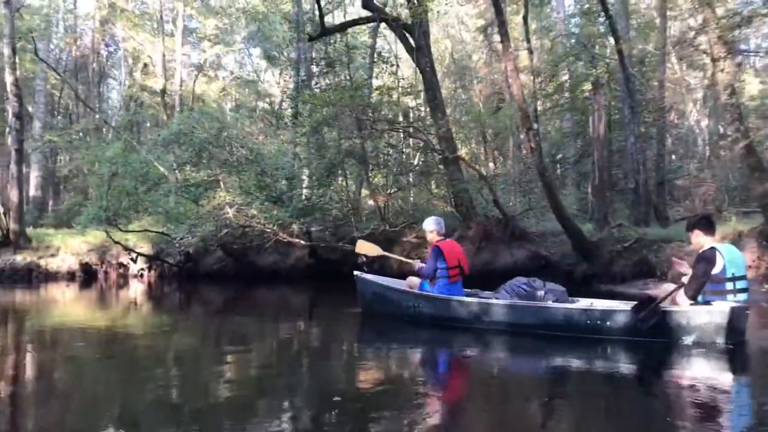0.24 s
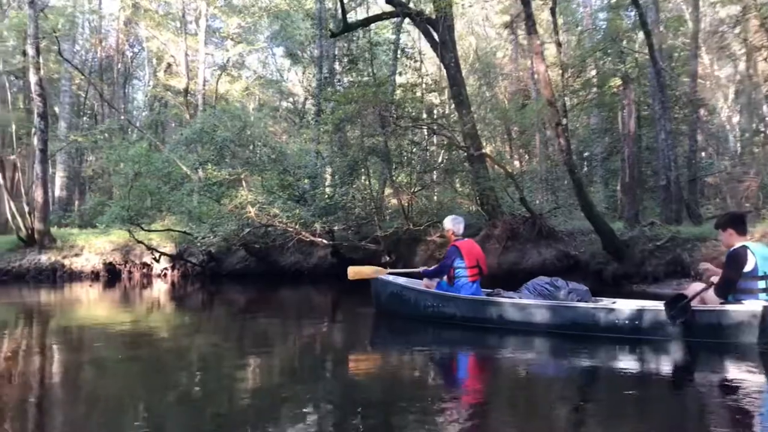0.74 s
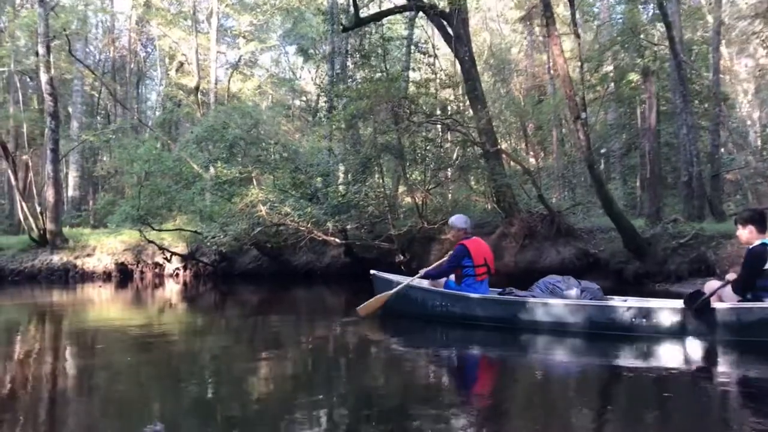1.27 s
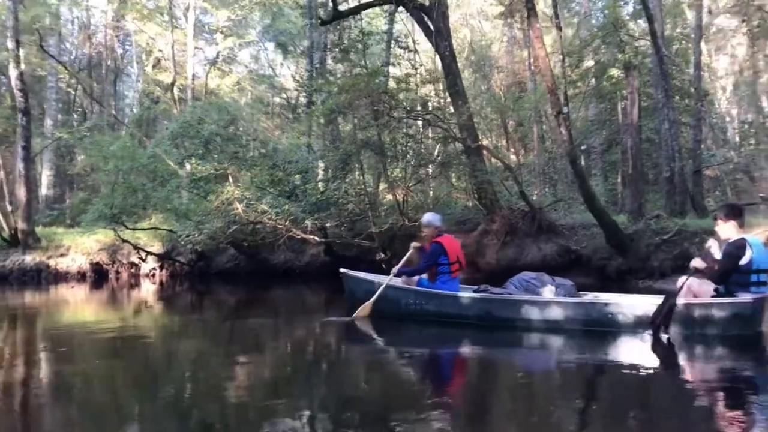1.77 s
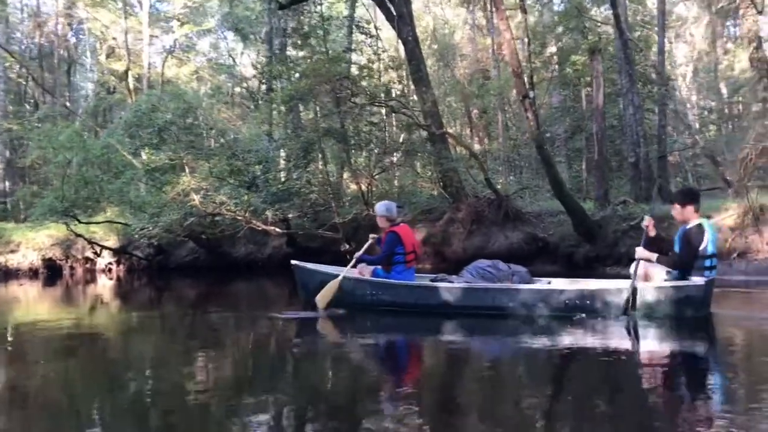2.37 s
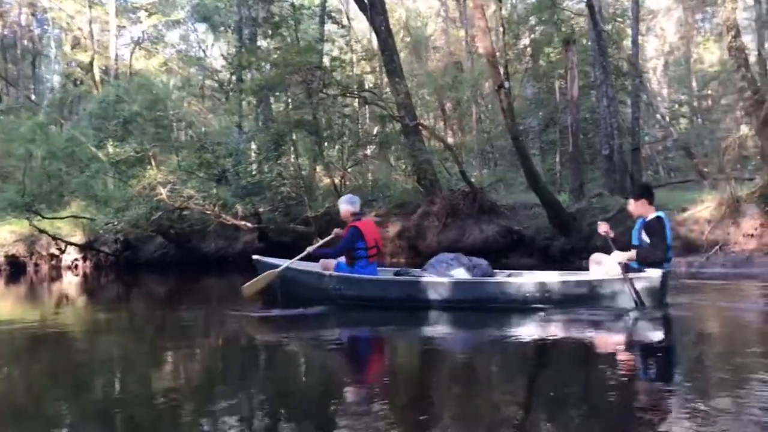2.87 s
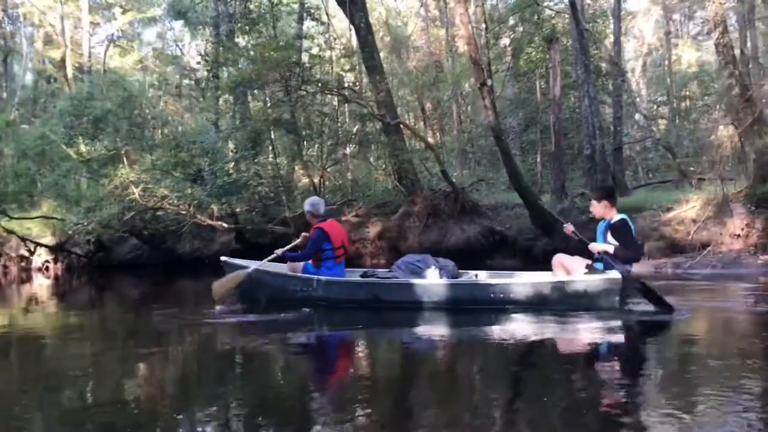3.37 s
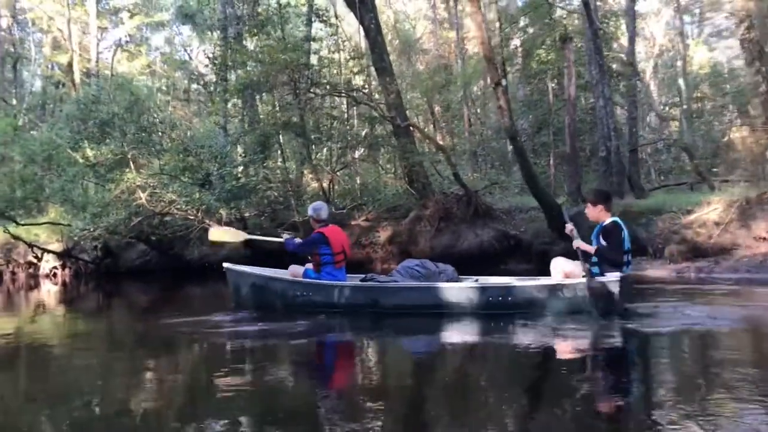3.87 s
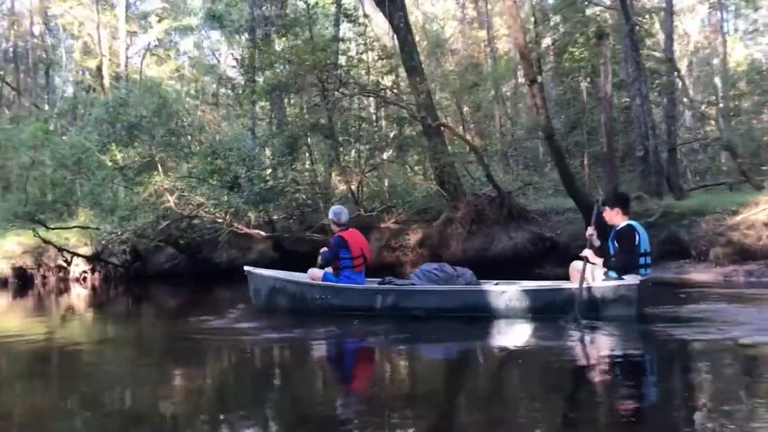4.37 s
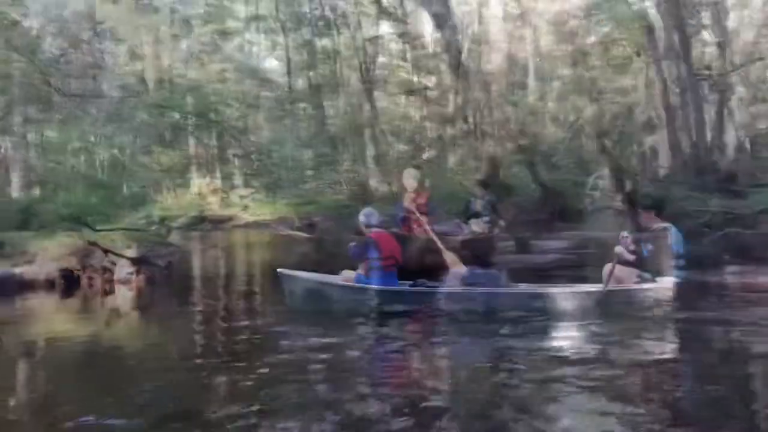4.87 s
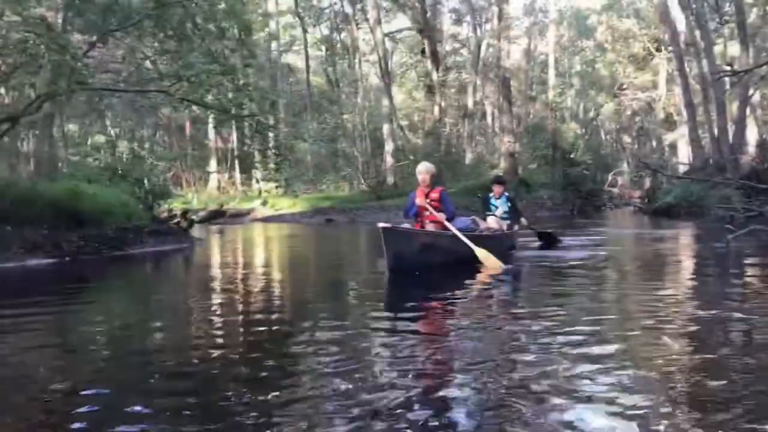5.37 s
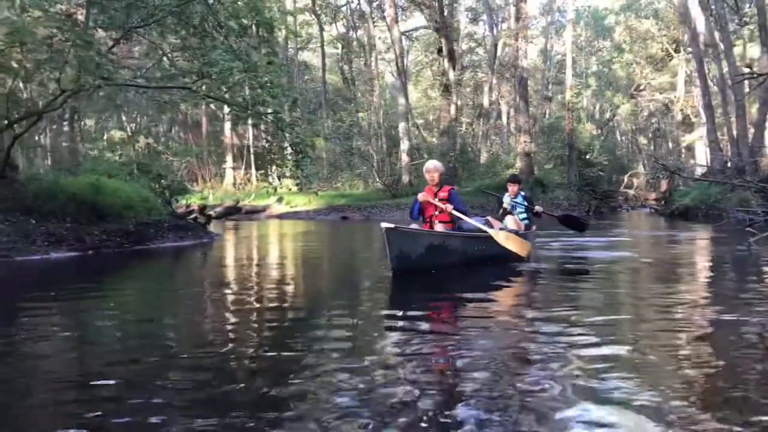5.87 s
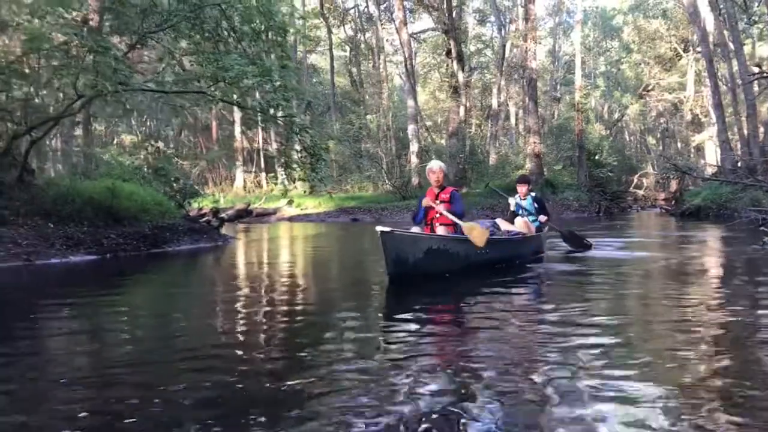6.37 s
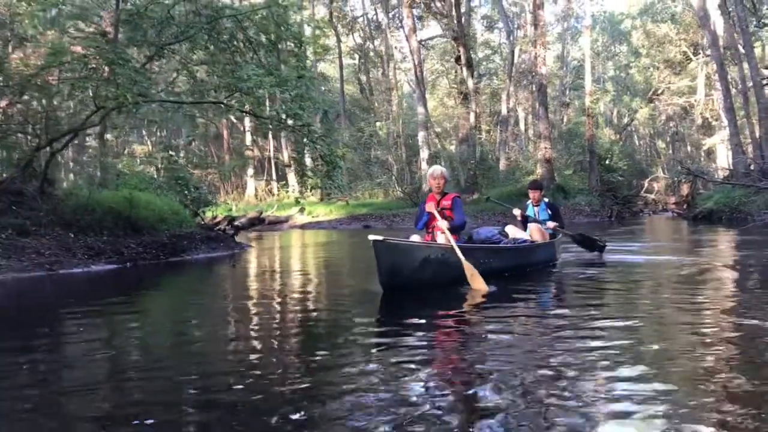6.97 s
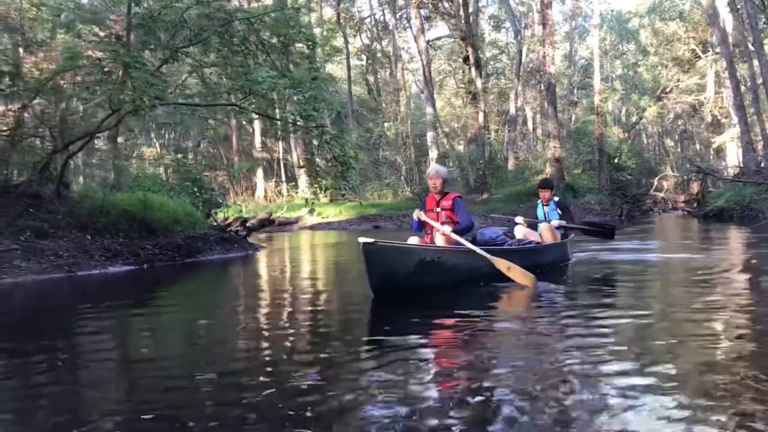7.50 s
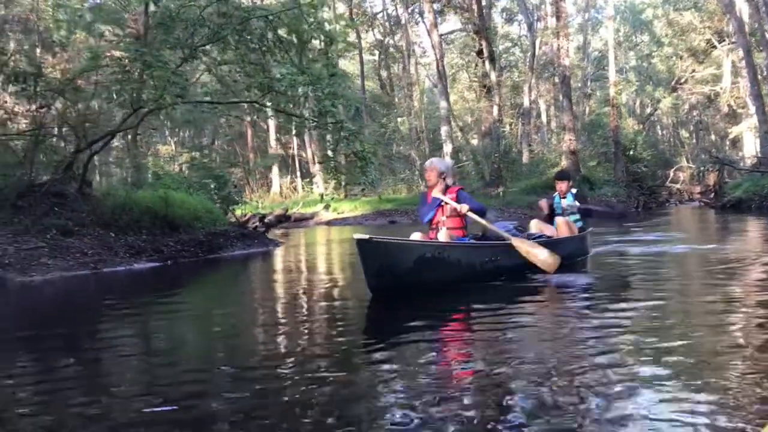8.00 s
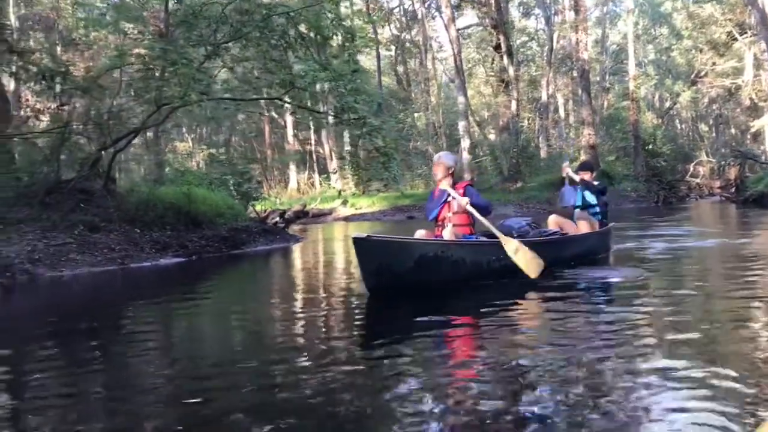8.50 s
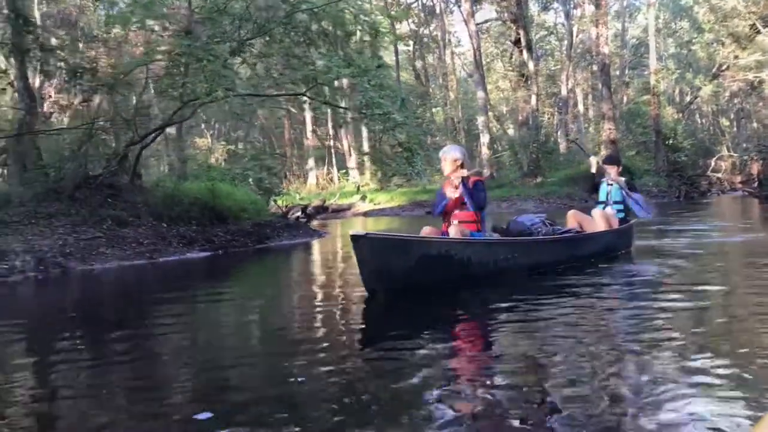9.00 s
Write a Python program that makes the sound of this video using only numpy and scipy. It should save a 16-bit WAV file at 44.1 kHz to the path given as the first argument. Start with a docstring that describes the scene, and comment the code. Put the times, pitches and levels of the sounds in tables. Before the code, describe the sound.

In a swamp forest, a steady shimmer of crickets sits over a faint far rumble, with a soft frog trill at the start. A cluster of hollow metal canoe knocks begins the paddling, then blades gurgle, plop and drip. Midway a nearer cricket and high katydid buzz join, and later one strong hull thump lands before more drips. The microphone is near the boat, with centred sound and light woodland echo.

```python
"""First a crowd of crickets sings over a far rumble in a swamp forest, with a frog's trill close behind.
Then a metal canoe is paddled: shafts knock on the hull, and blades stir the water into gurgles and drips.
A few birds call. About halfway, a near cricket and the high buzz of katydids fade in.
Singers are pure notes or shaped noise, water is bubbles and noise, and the hull is a set of ringing modes.
The forest echoes much of it, and both channels carry the same sound."""
import sys
import numpy as np
from scipy import signal
from scipy.fft import rfft, irfft, next_fast_len
from scipy.io import wavfile
from scipy.ndimage import uniform_filter1d, map_coordinates

SR = 44100
rng = np.random.default_rng(int(sys.argv[2]) if len(sys.argv) > 2 else 0)


def waveform_to_disk(signal):
    """Save audio, clipped to [-1, 1], as 16-bit WAV at the path in sys.argv[1]."""
    frames = np.transpose(np.atleast_2d(signal))
    scaled = np.clip(frames, -1, 1) * 32767
    samples = np.round(scaled).astype(np.int16)
    wavfile.write(sys.argv[1], SR, samples)


N = 407925  # length in samples


def amp(db):
    """Turn a level in dB into a gain."""
    return 10 ** (np.asarray(db) / 20)


def unit(x):
    """Scale x to an average (rms) level of 1."""
    return x / np.sqrt(np.mean(x ** 2) + 1e-20)


def along(points, hz):
    """Read a (frequency, value) table at hz, with straight lines on a log frequency axis."""
    point_hz, value = np.transpose(points)
    return np.interp(np.log(hz + 1), np.log(point_hz + 1), value)


def curves(rows):
    """Draw each column after the time as a curve with one value per sample."""
    s, *columns = np.transpose(rows)
    return [np.interp(np.arange(N) / SR, s, column) for column in columns]


def wobble(rate):
    """A smooth random curve through `rate` random points a second."""
    points = rng.standard_normal(int(N * rate / SR) + 4)
    return map_coordinates(points, [np.arange(N) * rate / SR])


def filtered(x, response):
    """Multiply the spectrum of x by a response that depends on frequency."""
    size = next_fast_len(N + SR // 2)
    return irfft(rfft(x, size) * response(np.fft.rfftfreq(size, 1 / SR)), size)[..., :N]


def rush(spectrum, patchy_db):
    """Coloured noise of rms 1, made uneven by random louder and softer patches."""
    z = signal.stft(rng.standard_normal(N + SR // 10), nperseg=512)[2]
    field = uniform_filter1d(rng.standard_normal(z.shape), size=6, axis=0)  # smooth over frequency
    field = uniform_filter1d(field, size=10, axis=1)  # smooth over time
    noise = signal.istft(z * amp(patchy_db * unit(field)), nperseg=512)[1][:N]
    return unit(filtered(noise, lambda hz: amp(along(spectrum, hz))))


def placed(s, waves):
    """Add up the rows of waves, each starting at its own time s."""
    at = np.round(np.asarray(s) * SR).astype(int)[:, None] + np.arange(waves.shape[1])
    return np.bincount(at.ravel(), waves.ravel(), N)[:N]


def chirps(s, db, hz, length, arch, top=0):
    """Pure notes whose pitch arches up to hz and down; top (-1 to 1) shifts the crest along the note."""
    u = np.linspace(-1, 1, int(length * SR))
    turns = np.cumsum(1 - arch * (u - top) ** 2) / SR * hz[:, None]
    phase = 2 * np.pi * turns + 2 * np.pi * rng.random((len(s), 1))
    fade = np.minimum(3 * (1 - abs(u)), 1)
    return placed(s, amp(db)[:, None] * fade * np.sin(phase))


def second_reach(t):
    """The fade of the near cricket and the katydids: 0 before 4.86 s, 1 after 5.48 s."""
    return np.interp(t, [4.86, 5.48], [0, 1])


# how long the echo lasts: (frequency [Hz], time to fall by 60 dB [s])
FOREST_DECAY = [(60, 1), (250, 0.61), (1000, 0.12), (4500, 0.56), (7000, 0.61), (16000, 0.31)]


def forest(x):
    """Trunks and banks answer: the scatter builds up, then each frequency dies at its own speed."""
    hz, t, z = signal.stft(rng.standard_normal(SR), SR, nperseg=256)
    build = np.minimum(t / .04, 1) ** 2
    decay = amp(-60 * t / along(FOREST_DECAY, hz)[:, None])
    tail = signal.istft(z * build * decay, SR, nperseg=256)[1]
    delayed = np.pad(x, (round(.006 * SR), 0))
    return signal.fftconvolve(delayed, tail / np.linalg.norm(tail))[:N]


# still air: (time [s], rumble level [dB], drone level before its sway [dB], hiss level [dB])
AIR_LEVELS = [(0.0, -59, -65.5, -70), (2.24, -58.5, -65.5, -67), (9.25, -64, -67, -67)]
# colours of the three noises: (frequency [Hz], relative level [dB])
RUMBLE_COLOUR = [(15, -38), (30, -2.5), (60, -0.5), (100, -7.5), (140, -8), (220, -56)]
DRONE_COLOUR = [(70, -49), (130, -4), (190, -2), (230, 0), (310, -6), (420, -14.5), (650, -55)]
HISS_COLOUR = [(300, -5), (450, 12.5), (1000, 10), (2200, 6), (3000, 7), (3700, 15), (4400, 3), (8000, 1.5),
               (10500, -1.5), (12500, 8), (16000, -1)]
DRONE_SWAY_DB = 1.5


def air():
    """Noise in three bands: a far rumble, a swaying drone, and a faint hiss with far insects under 4 kHz."""
    rumble_db, drone_db, hiss_db = curves(AIR_LEVELS)
    rumble = amp(rumble_db) * rush(RUMBLE_COLOUR, patchy_db=-0.2)
    drone = amp(drone_db + DRONE_SWAY_DB * wobble(4.9)) * rush(DRONE_COLOUR, patchy_db=1.2)
    return rumble + drone + amp(hiss_db) * rush(HISS_COLOUR, patchy_db=0.45)


# the whole crowd of crickets: (time [s], level [dB])
CROWD_LEVEL = [(0.0, -51.5), (4.6, -52.5), (5.35, -54), (9.25, -53.5)]
# how strongly each pitch is sung: (pitch [Hz], relative level [dB])
SINGERS_COLOUR = [(5200, -23.5), (5600, -13), (5900, -2), (6250, 0), (6550, -3.5), (6850, -9), (7200, -18),
                  (7600, -29.5)]


def crowd():
    """Many crickets, each at its own pitch and pace, mostly heard as scattered sound."""
    hz = np.linspace(SINGERS_COLOUR[0][0], SINGERS_COLOUR[-1][0], num=48)
    luck = rng.random((len(hz), 2))
    s = (luck[:, :1] + np.arange(N // 3000)) * (.08 + .02 * luck[:, 1:])  # one note every 80 to 100 ms
    db = along(SINGERS_COLOUR, hz)[:, None] + 1.9 * rng.standard_normal(s.shape)
    hz = hz[:, None] * (1 + 0.00797 * rng.standard_normal(s.shape))
    keep = s < N / SR
    song = unit(chirps(s[keep], db[keep], hz[keep], length=0.033, arch=0.0386))
    echo = amp(6.5) * forest(song)
    blur = amp(12.5) * rush([(4900, -41)] + SINGERS_COLOUR + [(8000, -55)], patchy_db=0.6)
    song = unit(song + echo + blur)
    overtone = unit(filtered(song ** 2, lambda f: f > 8000))  # the wing is not quite linear
    return amp(curves(CROWD_LEVEL)[0]) * (song + amp(-29.0) * overtone)


# colour of the far katydid chorus: (frequency [Hz], relative level [dB])
WINGS_COLOUR = [(9500, -84), (10800, -11), (12200, 3), (14000, 5), (15500, 5), (16000, -17)]
# single katydids, before the shared fade-in: (start [s], end [s], centre [Hz], width [Hz], level [dB],
# buzzes per second [Hz], time of one buzz [s])
KATYDID_BOUTS = [(5.0, 6.95, 12250, 220, -80, 27.73, 5.196), (5.7, 7.05, 14300, 700, -75, 30.2, 6.0925),
                 (7.75, 8.4, 14300, 700, -78, 29.7, 7.886), (8.3, 8.95, 12250, 220, -82, 27.5, 8.509)]
CHORUS_DB, BOUT_EDGE_S = -73, 0.19


def katydids():
    """A high, smooth rasp from many; now and then one singer's band of noise pulses over it."""
    t = np.arange(N) / SR
    out = amp(CHORUS_DB) * rush(WINGS_COLOUR, patchy_db=0.5)
    for start, end, hz, width_hz, db, rate, s in KATYDID_BOUTS:
        noise = rng.standard_normal(N)
        rasp = unit(filtered(noise, lambda f: np.exp(-((f - hz) / width_hz) ** 2 / 2)))
        buzz = unit((1 + np.cos(2 * np.pi * rate * (t - s))) ** 1.8)
        fade = np.clip(np.minimum(t - start, end - t) / BOUT_EDGE_S, 0, 1)
        out = out + amp(db) * fade * buzz * rasp
    return second_reach(t) * out


# runs of piped notes: (first [s], last [s], gap between notes [s], top pitch [Hz],
# top level [dB], level of the weak smear filling the gaps between notes [dB])
PIPED_RUNS = [(0.224, 1.604, 0.11, 2870, -68, -72), (8.284, 9.025, 0.11, 3110, -70, -95)]
RUN_SAG, RUN_FADE_DB = 0.047, 3  # share of pitch, and level, lost towards both ends of a run


def pipers():
    """A frog's trill and a far bird's pips: even runs of notes that swell and rise towards the middle."""
    out = 0
    for first, last, gap, hz, db, smear_db in PIPED_RUNS:
        s = np.arange(first, last, gap / 2)
        s = s + .003 * rng.standard_normal(len(s))
        edge = (2 * (s - first) / (last - first) - 1) ** 2  # 0 mid-run, 1 at its ends
        # every second chirp stands for the weak smear in a gap
        level = np.where(np.arange(len(s)) % 2, smear_db, db) - RUN_FADE_DB * edge
        level = level + 2 * rng.standard_normal(len(s))
        out = out + chirps(s, level, hz * (1 - RUN_SAG * edge), length=0.0343, arch=0.0303, top=0.55)
    return out


# bird notes: (time [s], length [s], first pitch [Hz], middle pitch [Hz], last pitch [Hz], level [dB],
# shake [0-1], level sent into the forest, relative to the note [dB])
BIRD_NOTES = [(4.158, .027, 6860, 7330, 7700, -59, .1, 1), (4.232, .066, 2800, 5170, 3100, -51.5, 0.33, 6),
              (4.31, 0.093, 4250, 4670, 5200, -68, 0.83, 14),
              (4.39, 0.067, 5470, 5550, 5564, -47.5, 0.4, 0), (4.462, 0.022, 4900, 2930, 1860, -60, 0, 4.5),
              (8.35, 0.16, 2180, 2270, 2175, -71, 0, 0), (8.525, 0.061, 2300, 2280, 2200, -71, 0.1, -4),
              (9.018, .028, 4530, 4800, 5800, -56.5, 0.1, -18)]
NOTE_EDGE_S = 0.0042  # attack and release


def birds():
    """Whistles bending through three pitches, and their share for the forest."""
    out, sent, t = np.zeros(N), np.zeros(N), np.arange(N) / SR
    for s, length, first_hz, middle_hz, last_hz, db, shake, echo_db in BIRD_NOTES:
        u = np.clip(2 * (t - s) / length - 1, -1, 1)  # -1 at the start of the note, 1 at its end
        bend_hz = (first_hz + last_hz) / 2 - middle_hz
        hz = middle_hz + u * (last_hz - first_hz) / 2 + u * u * bend_hz
        # a fast shake roughens the pitch where echo overlaps the call
        shaking = 0.29 * shake ** 3 * np.sin(2 * np.pi * 95 * t + 0.88 * wobble(40))
        phase = 2 * np.pi * np.cumsum(hz * (1 + shaking)) / SR
        sounding = np.minimum((1 - abs(u)) * length / 2 / NOTE_EDGE_S, 1)
        song = amp(db) * sounding * (np.sin(phase) + amp(-27) * np.sin(2 * phase))
        out = out + song
        sent = sent + amp(echo_db) * song
    return out, sent


# wing strokes the near cricket leaves out: stroke number, counted from 0 [no unit]
RESTED_STROKES = [25, 27, 28, 29]
NEAR_FIRST_S, STROKES_PER_S = 4.801, 11.33
NEAR_DB, NEAR_HZ = -46, 6672  # average note, before the fade-in


def cricket():
    """The near cricket: each wing stroke sounds one pure note with an arched pitch."""
    s = np.delete(np.arange(NEAR_FIRST_S, N / SR, 1 / STROKES_PER_S), RESTED_STROKES)
    scatter = rng.standard_normal((len(s), 2))
    db = NEAR_DB + 1 * scatter[:, 0]
    hz = NEAR_HZ + 25 * scatter[:, 1]
    notes = chirps(s - .015, db, hz, length=0.0252, arch=0.068)
    return np.sqrt(second_reach(np.arange(N) / SR)) * notes


def bubbles(s, db, hz, cycles, rise, size):
    """Damped sines whose pitch climbs as the bubble nears the surface."""
    turns = np.arange(size) / SR * hz[:, None]
    age = turns / np.maximum(cycles, 1)[:, None]  # in lifetimes
    level = amp(db[:, None] - 14.3 * age) * (1 - np.exp(-turns / 0.77))
    climb = 1 + rise[:, None] * np.minimum(age, 2) / 2
    return placed(s, level * np.sin(2 * np.pi * turns * climb))


def swarm(db, rate, centre_hz, spread, cycles, size):
    """Random bubbles: pitches scatter around a centre, and a few are loud among many soft ones."""
    luck = rng.random((int(rate * N / SR), 4))
    hz = np.minimum(centre_hz * np.exp(spread * rng.standard_normal(len(luck))), 14000)
    each_db = -4.5 * np.log(luck[:, 1] + 0.012)
    life = cycles * (.5 + luck[:, 2])
    return amp(db) * unit(bubbles(luck[:, 0] * N / SR, each_db, hz, life, 0.222 * luck[:, 3], size))


def bursts(s, db, t60, spectrum):
    """Puffs of coloured noise with a sudden start, falling by 60 dB in t60 seconds."""
    return placed(s, amp(db[:, None] - 60 * np.arange(2000) / SR / t60)) * rush(spectrum, patchy_db=2)


# blades in the water: (in [s], out [s], gurgle level [dB], fizz level [dB])
PADDLE_PULLS = [(1.845, 2.343, -59, -70.5), (2.445, 2.714, -62, -61), (2.862, 2.99, -57.5, -61.5),
                (3.112, 3.273, -54, -56.5), (3.46, 3.644, -65, -62), (5.427, 5.565, -60.5, -61),
                (5.75, 5.93, -68, -65), (6.247, 6.452, -73.5, -77.5), (7.088, 7.365, -60, -64),
                (7.488, 7.688, -61.5, -63), (7.924, 8.15, -70, -68)]
RISE_DB_PER_S, FALL_DB_PER_S = 78, 47
LAP_S, LAP_DB = 1.9, -77.5  # from then on the water never quite settles


def stirring():
    """Gurgle and fizz levels in dB: each pull swells, holds and dies away over a faint lapping."""
    t = np.arange(N) / SR
    lap_db = LAP_DB - RISE_DB_PER_S * np.maximum(LAP_S - t, 0)
    power = amp(2 * lap_db) * np.ones((2, 1))
    for start, end, *db in PADDLE_PULLS:
        shape_db = -RISE_DB_PER_S * np.maximum(start - t, 0) - FALL_DB_PER_S * np.maximum(t - end, 0)
        power = power + amp(2 * (np.c_[db] + shape_db))
    return 10 * np.log10(power)


# colour of wash and splash noise: (frequency [Hz], relative level [dB])
WASH_COLOUR = [(250, -0.5), (450, -16.5), (700, -8), (1300, 5), (2200, -1.5), (4000, -6.5), (9000, -19),
               (16000, -36)]
# the loudest bubbles, drips and gulps, with a small knock (1.294, 1.31) and a tick (8.77):
# (time [s], level before decay [dB], pitch before it climbs [Hz], life [cycles])
LOUD_DRIPS = [(1.294, -49, 644, 11), (1.31, -51, 520, 9.7), (1.626, -54, 1335, 30), (1.763, -38, 1090, 23),
              (1.857, -32.5, 993, 11.5), (2.074, -41.5, 785, 7.2), (2.117, -46, 687, 23),
              (2.154, -32, 586, 4.2), (2.212, -40, 730, 10), (2.245, -40, 980, 18), (2.269, -48, 1026, 17),
              (2.458, -42.5, 2330, 18), (2.541, -41, 2140, 13), (2.702, -33, 1930, 5.7),
              (2.757, -44, 586, 13), (2.855, -39, 350, 12), (2.91, -33, 695, 3.7), (2.934, -43, 623, 17),
              (3.133, -28.5, 1630, 6.8), (3.168, -28.5, 1240, 4.5), (3.239, -30.5, 1220, 3.6),
              (3.386, -43.5, 278, 14), (3.409, -45, 736, 11), (3.462, -48, 977, 26),
              (3.656, -35.5, 1023, 6.1), (3.747, -45.5, 1620, 13), (3.981, -45, 1760, 9),
              (4.053, -45, 1230, 13), (4.076, -38.5, 2760, 6.7), (4.343, -43, 2500, 4.8),
              (4.499, -54, 884, 21), (4.572, -48.5, 1980, 21), (4.843, -45, 1190, 3),
              (5.035, -52, 2140, 14), (5.301, -52, 1770, 25), (5.442, -48.5, 720, 28),
              (5.467, -41.5, 803, 8.1), (5.547, -38.5, 1500, 6.7), (5.649, -47, 1306, 24),
              (5.673, -50.5, 346, 14), (5.9, -46, 2440, 8.7), (5.946, -41.5, 2720, 14),
              (6.972, -39, 596, 5.6), (7.011, -41, 1910, 15), (7.081, -40.5, 916, 12.5),
              (7.131, -57, 1010, 17), (7.176, -43.5, 1070, 17), (7.282, -43, 1610, 15),
              (7.352, -44.5, 571, 13), (7.404, -30, 1555, 15.4), (7.501, -50, 974, 23),
              (7.529, -49, 630, 25), (7.558, -48.5, 565, 16), (7.576, -40, 2260, 17),
              (7.664, -32.5, 2000, 1.6), (7.69, -46, 940, 13), (7.773, -45.5, 1580, 10),
              (8.039, -49.5, 737, 19), (8.219, -54, 3280, 26), (8.314, -56, 2010, 15),
              (8.77, -41.5, 990, 2.5)]
# the loudest spray ticks: (time [s], level before decay [dB])
SPRAY_TICKS = [(2.406, -51), (2.461, -45), (2.544, -45.5), (2.744, -48), (3.0046, -55), (3.049, -53),
               (3.144, -40.5), (3.494, -47), (3.5144, -44), (3.585, -47), (3.647, -42.5), (3.914, -58),
               (5.7187, -50), (5.7403, -48), (7.7506, -50), (8.0174, -43.5), (8.0374, -48), (8.114, -51)]


def water():
    """Bubbles and wash noise follow the stirring; big bubbles, drips and spray ticks stand out."""
    gurgle_db, fizz_db = stirring()
    gurgle = swarm(gurgle_db, rate=220, centre_hz=956.5, spread=0.454, cycles=11.7, size=1100)
    plops = swarm(gurgle_db - 2, rate=35, centre_hz=946, spread=0.39, cycles=12.8, size=2000)
    fizz = swarm(fizz_db + 2 * wobble(9), rate=700, centre_hz=2526, spread=0.469, cycles=5.8, size=300)
    mist = swarm(fizz_db - 13, rate=300, centre_hz=9000, spread=.4, cycles=2.5, size=60)
    slaps = amp(5.7 * wobble(45) + 4.6 * wobble(140))  # ripples break in quick, uneven bursts
    wash = amp(gurgle_db - 1) * unit(slaps * rush(WASH_COLOUR, patchy_db=2))

    s, db, hz, cycles = np.transpose(LOUD_DRIPS)
    # quiet, short-lived bubbles climb most; loud or long-lived ones form deep and hold their pitch
    rise = np.clip((-29.0 - db) / 50, 0, .2) * np.minimum(14 / cycles, 1) ** 2
    drips = bubbles(s, db, hz, cycles, rise, size=3000)
    splash = bursts(s, db - 15, 0.097, WASH_COLOUR)  # a little spray goes with each

    s, db = np.transpose(SPRAY_TICKS)
    high = bursts(s, db, 0.016, [(3000, -32), (6500, 15), (9000, 11), (13000, 7), (16000, 14)])
    low = bursts(s, db - 4.5, 0.043, [(400, -30), (1000, 5), (2500, -9), (5000, -5), (9000, -44)])
    return gurgle + plops + fizz + mist + wash + drips + splash + high + low


# knocks on the hull, some echoes or bounces of them (4.895, 5.003, 6.931), and one gulp-like
# thud (3.288): (time [s], overall level [dB], extra hardness [dB])
HULL_KNOCKS = [(1.681, -14.5, 3.5), (1.708, -18.5, 0), (1.744, -24.5, -8), (1.785, -19.5, -4.5),
               (1.808, -20, -5), (1.839, -37, 0), (1.958, -20, -4), (1.968, -34, 6.5), (3.288, -38, 4),
               (4.864, -26.5, -1), (4.895, -39, 0), (5.003, -36.5, -6), (5.258, -33, -2.5),
               (6.817, -11.5, 1.5), (6.931, -23, -0.5)]
# ringing modes of the metal: (centre pitch [Hz], relative level [dB], time to fall by 60 dB [s])
HULL_MODES = [(71.7, -0.5, 0.13), (125.4, -9, 0.18), (171.5, 1, 0.12), (234.9, 0.5, 0.26),
              (259, -5.5, 0.11), (324, -3, 0.13), (392.4, -13, 0.21), (430, -3.5, 0.039),
              (546.6, 8.5, 0.033), (653, -10, 0.11), (853, -3, 0.15), (1085, 5.5, 0.059), (1385, 2, 0.096),
              (1592, -3.5, 0.031), (1966, 15, 0.024), (2330, -5.5, 0.26), (3170, 2, 0.048),
              (3786, 11.5, 0.015), (4980, -2.5, 0.034)]
# parts of a knock: first heard from the side of the hull, then from the bow (after LATER_S)
LATER_S = 4.86
DEEP_DB, LOW_DB, BODY_DB = (-19, -32.5), (-23, -20), (-20, -31.5)
THUMP_DB, RATTLE_DB = (-8.5, -3), (-12.5, -9)
MIDDLE_DB, BRIGHT_DB, CRACK_DB = -33, -41.5, -21  # the same throughout, for hardness 0
MIDDLE_HARDENS = 0.65  # dB per dB of hardness; bright modes and crack follow it fully


def hull():
    """A knock thumps the side panel, then the modes ring; higher modes come as crowded clusters."""
    t = np.arange(SR // 3) / SR
    hz, level, t60 = np.repeat(HULL_MODES, repeats=7, axis=0).T[:, :, None]
    swing = t / .008
    # the thump swells for 8 ms, then dies away while its pitch sags
    thump = swing ** 3 * np.exp(3 * (1 - swing)) * np.sin(2 * np.pi * 310 * t * (1 - 7 * t))
    loose = signal.butter(1, [380, 1100], 'band', fs=SR, output='sos')
    waves = []
    for s, db, hard_db in HULL_KNOCKS:
        view = int(s > LATER_S)
        middle_hard_db = MIDDLE_HARDENS * hard_db
        colour = np.select(
            [hz < 110, hz < 420, hz < 700, hz < 1450],
            [DEEP_DB[view], LOW_DB[view], BODY_DB[view] + middle_hard_db, MIDDLE_DB + middle_hard_db],
            BRIGHT_DB + hard_db)
        luck = rng.standard_normal((len(hz), 3))
        pitch = hz * (1 + np.where(hz < 420, .035, .1) * luck[:, 1:2])
        # higher modes start at slightly scattered times, which roughens the attack
        since = np.maximum(t - 0.0022 * abs(luck[:, 2:]) * (hz > 420), 0)
        ring_db = level + colour + 3.1 * luck[:, :1] - 60 * since / t60
        ring = amp(ring_db) * np.sin(2 * np.pi * pitch * since)
        ring *= 1 - np.exp(-since * hz / 1.56)  # the panel needs about a cycle to swing up
        crack = amp(CRACK_DB + hard_db - 60 * t / 0.007) * rng.standard_normal(len(t))
        crack = signal.lfilter([.3], [1, -.6], crack)  # soften the treble
        # loose gear is shaken by the blow
        rattle = amp(RATTLE_DB[view] + middle_hard_db - 60 * t / 0.092) * rng.standard_normal(len(t))
        rattle = signal.sosfilt(loose, rattle)
        waves.append(amp(db) * (amp(THUMP_DB[view]) * thump + ring.sum(axis=0) + crack + rattle))
    return placed([row[0] for row in HULL_KNOCKS], np.array(waves))


def scene():
    """Add every source and the forest's echo, heard alike on both sides."""
    boat, wet, pips, near = hull(), water(), pipers(), cricket()
    song, sent = birds()
    echo = forest(amp(-13.5) * boat + amp(-8.5) * wet + amp(-3) * pips + amp(-8) * near + sent)
    mono = boat + wet + pips + near + song + echo + air() + crowd() + katydids()
    return np.array([mono, mono])


BASS_HZ, TOP_HZ = 38, 15780


def record(dry):
    """The microphone's path thins the deepest bass (four gentle filters) and cuts all above TOP_HZ."""
    def response(hz):
        bass_cut = 1j * hz / BASS_HZ / (1 + 1j * hz / BASS_HZ)
        return (hz < TOP_HZ) * bass_cut ** 4
    return filtered(dry, response)


dry = scene()
out = record(dry)
waveform_to_disk(out)
```